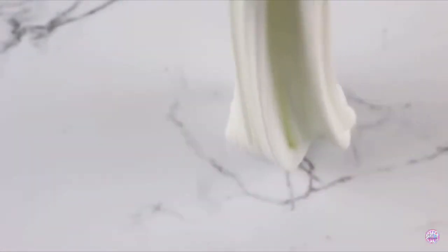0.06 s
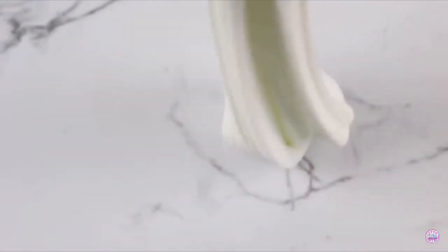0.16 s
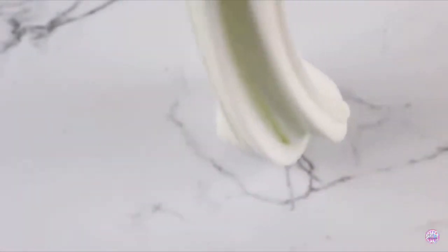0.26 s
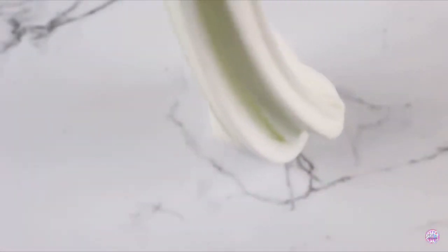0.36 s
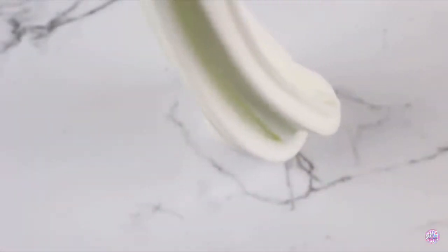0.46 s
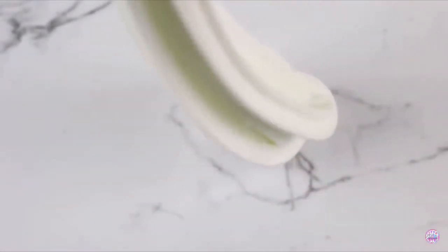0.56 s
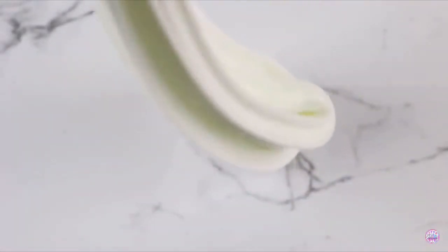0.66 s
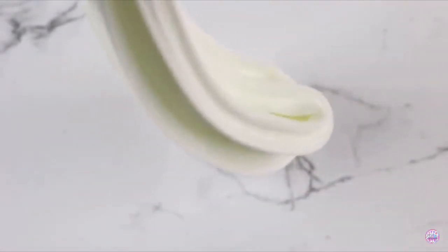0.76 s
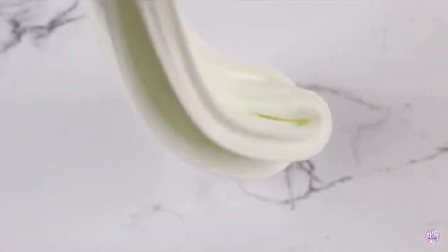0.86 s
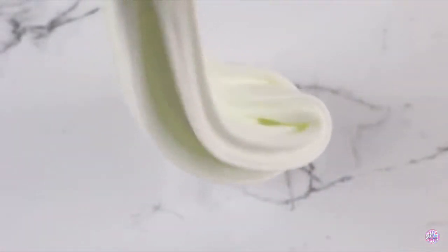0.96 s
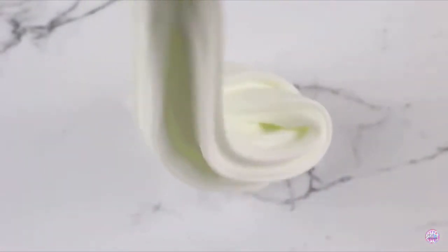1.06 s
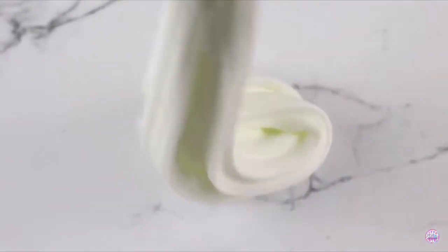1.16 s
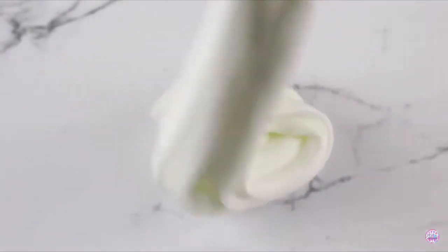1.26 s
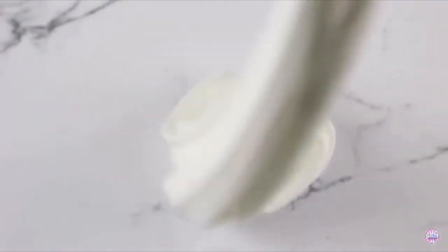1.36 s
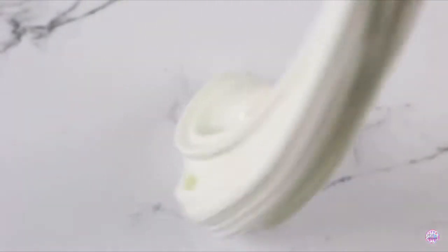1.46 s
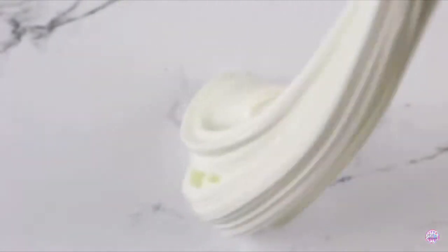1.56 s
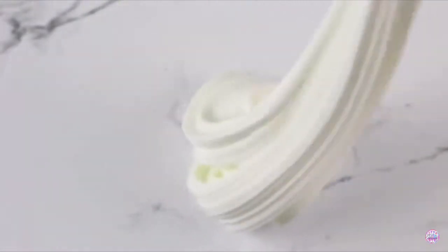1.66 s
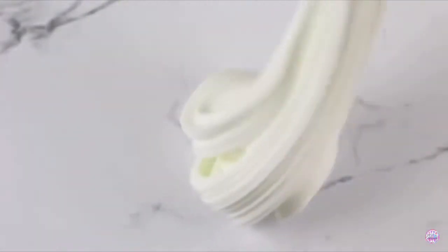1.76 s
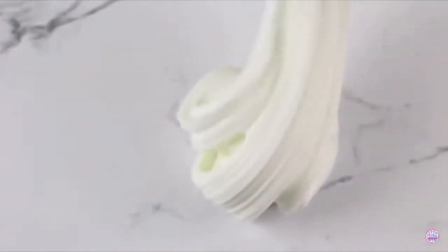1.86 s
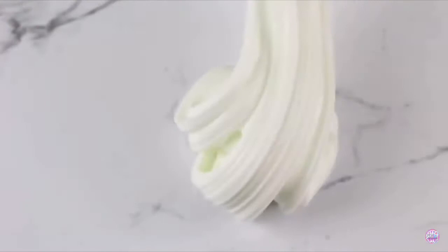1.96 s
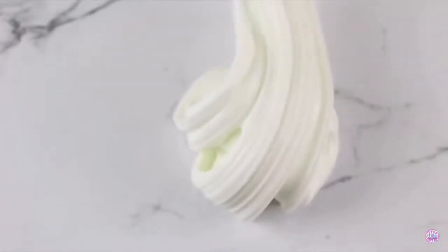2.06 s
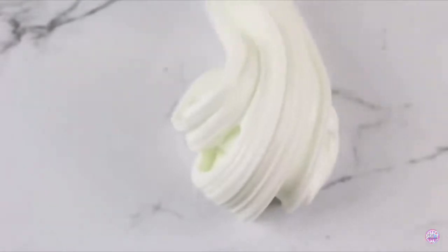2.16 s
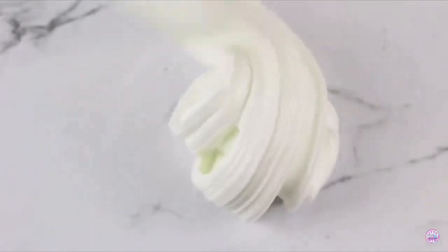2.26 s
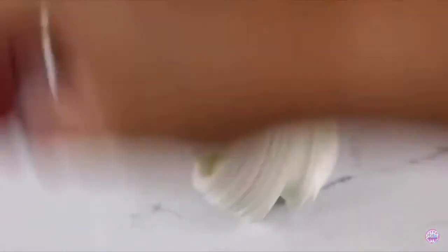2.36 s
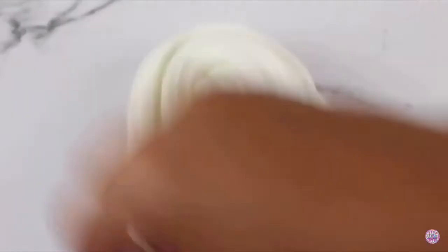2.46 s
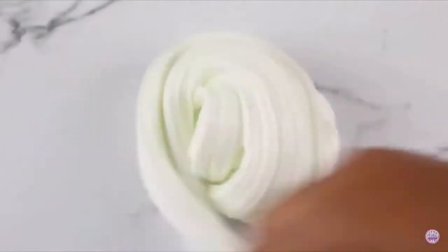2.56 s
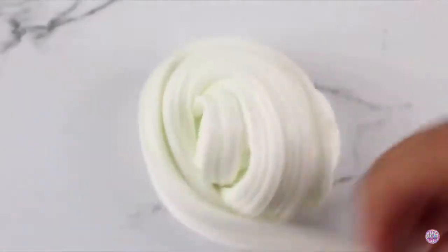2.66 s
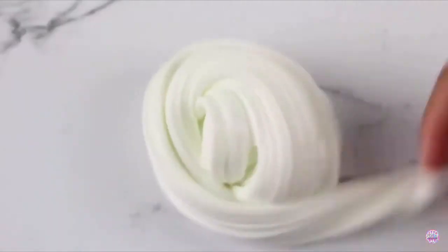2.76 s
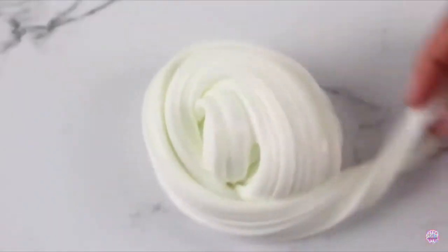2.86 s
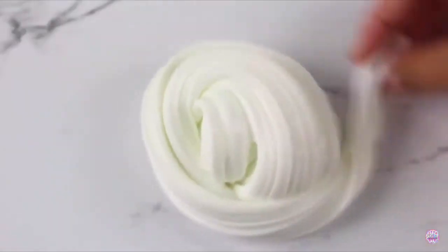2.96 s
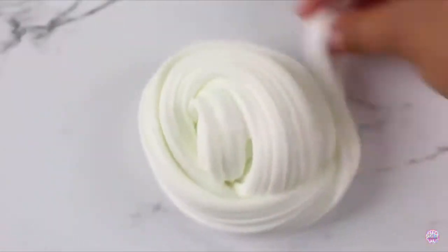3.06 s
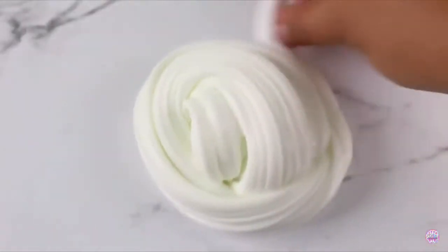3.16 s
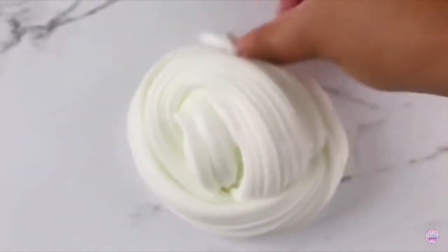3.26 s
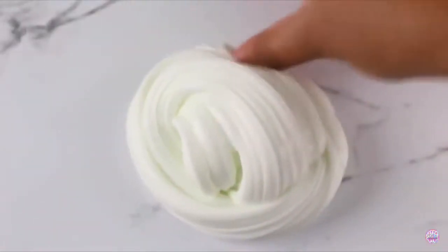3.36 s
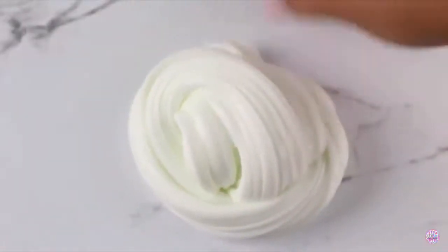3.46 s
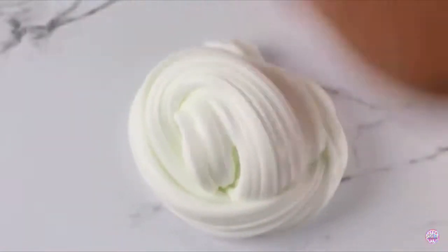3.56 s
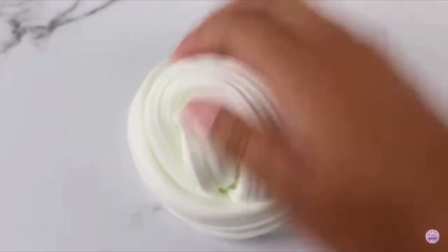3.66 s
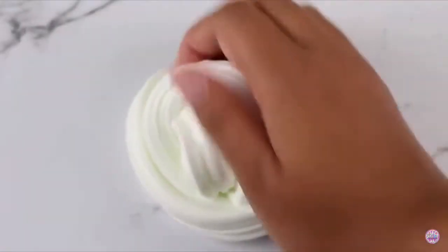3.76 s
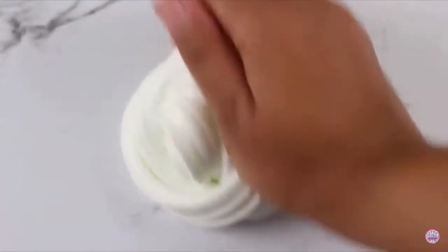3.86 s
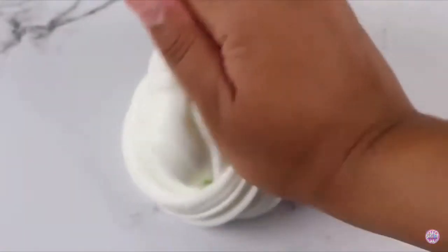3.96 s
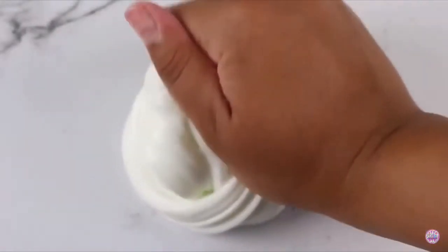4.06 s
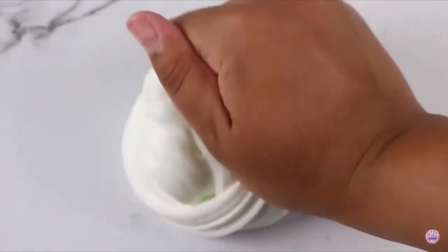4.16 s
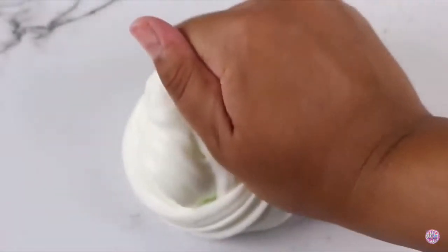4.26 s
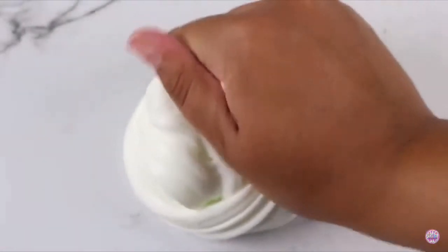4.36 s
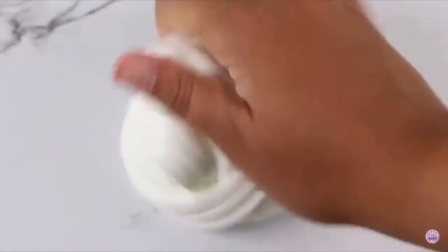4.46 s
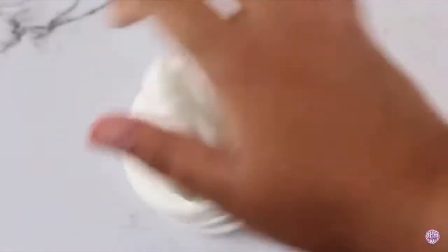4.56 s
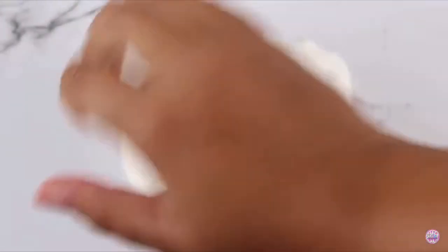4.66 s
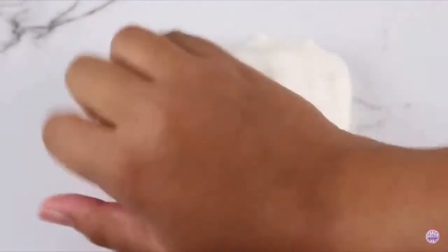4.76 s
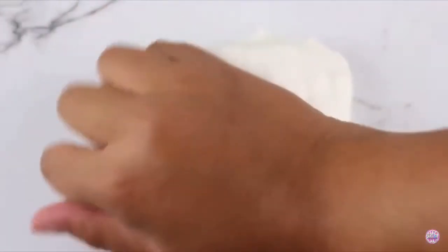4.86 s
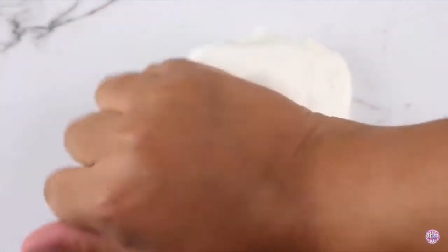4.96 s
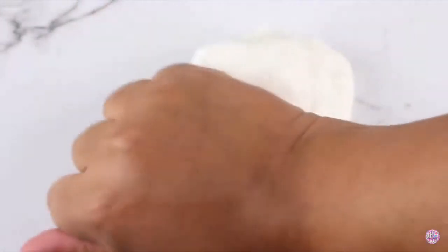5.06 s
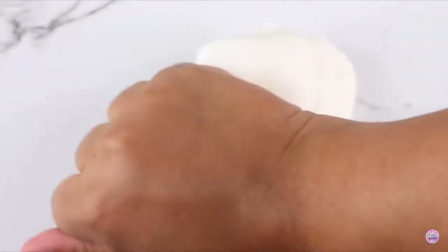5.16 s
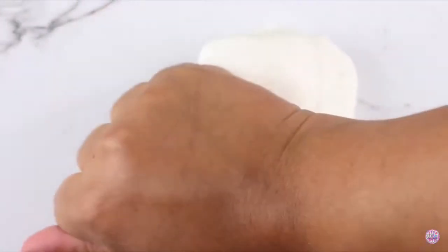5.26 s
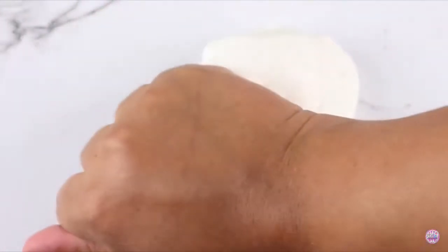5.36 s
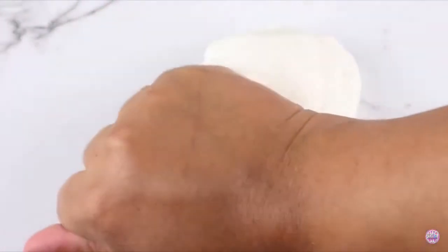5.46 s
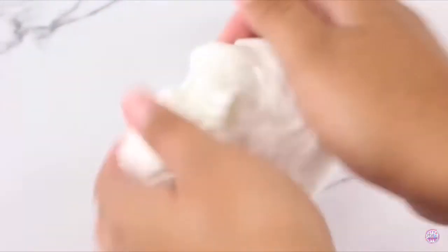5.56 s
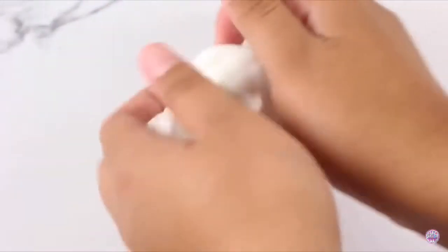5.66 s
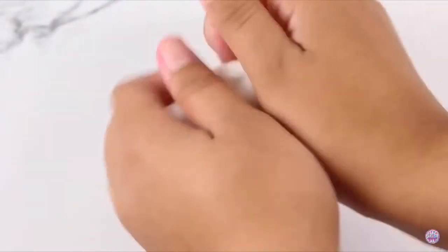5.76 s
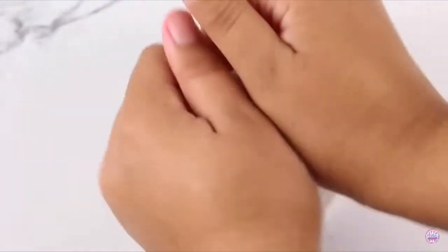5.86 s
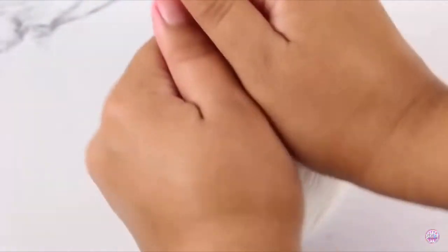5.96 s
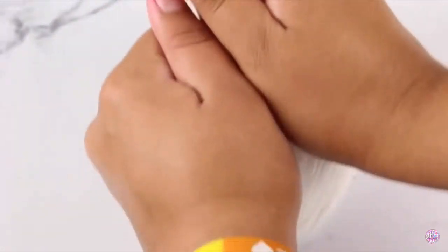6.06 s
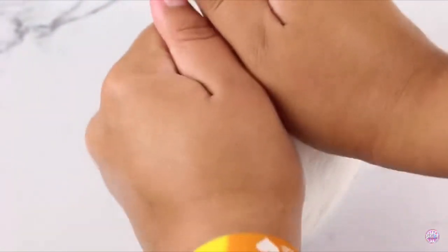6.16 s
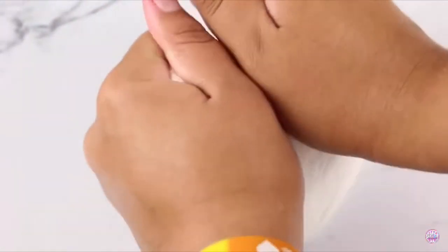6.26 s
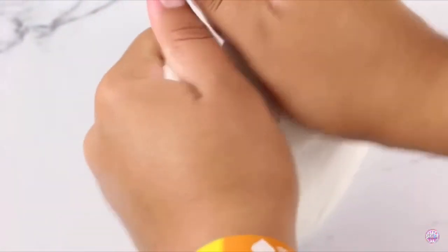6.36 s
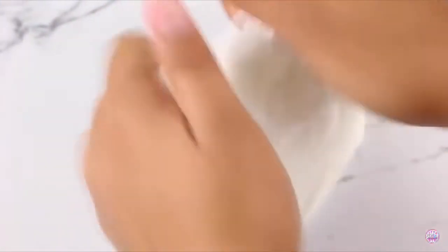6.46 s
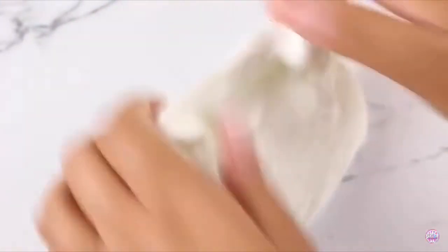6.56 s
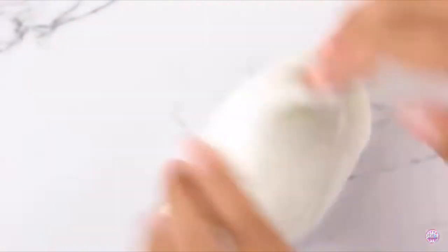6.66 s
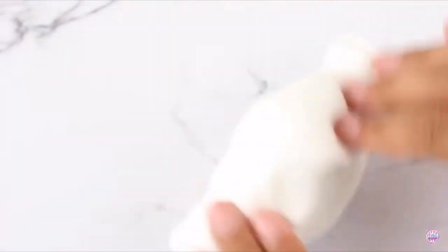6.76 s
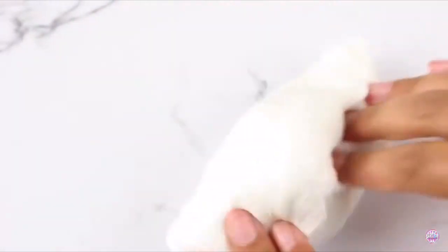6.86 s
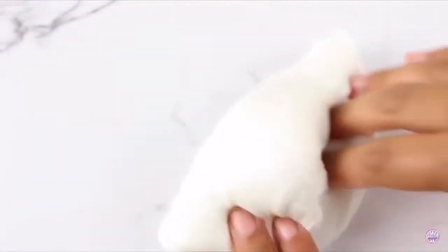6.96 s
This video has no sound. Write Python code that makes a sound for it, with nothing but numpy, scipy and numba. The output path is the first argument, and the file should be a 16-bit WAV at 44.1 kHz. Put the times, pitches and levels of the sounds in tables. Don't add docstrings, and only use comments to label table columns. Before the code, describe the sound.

Hands pat and squeeze airy slime on a hard tabletop, with sharp pops, bright snaps, wet gulps and hissing air close up in a quiet room.

```python
import sys
import numpy as np
from scipy import signal
from scipy.fft import rfft, irfft
from scipy.io import wavfile
from scipy.ndimage import uniform_filter1d
from numba import njit

SR = 44100
rng = np.random.default_rng(int(sys.argv[2]) if len(sys.argv) > 2 else 0)


def field_ratio(decibels):
    return 10 ** (np.asarray(decibels, dtype=float) / 20)


def generate_wav(sig):
    pcm = np.round(np.clip(np.atleast_2d(sig).T, -1, 1) * 32767).astype(np.int16)
    wavfile.write(sys.argv[1], SR, pcm)


N = 309136
TOP_HZ = 15720

# frequency in Hz, level in dB per Hz.
ROOM_HISS = [(12, -42), (42, -11), (66, -11), (193, -9), (472, -13.5), (1060, -16.5), (1610, -19),
             (16000, -28.5)]
# frequency in Hz, width of its wobble in Hz, level in dB.
MOTOR_HUM = [(58.6, 8.2, -52), (119, 23, -59)]

# start in seconds, level in dB, pocket pitch in Hz, length in ms.
PLAIN_POPS = [(2.7303, -36.5, 4460, 0.3), (3.008, -30.5, 1490, 1.7), (3.887, -37, 2450, 2.5),
              (4.1161, -32.5, 3800, 2.5), (4.1513, -31.5, 2830, 0.99), (4.2176, -32.5, 3900, 1.8),
              (4.2588, -17.5, 5300, 2.1), (4.2814, -21.5, 5360, 1.8), (4.4623, -13.5, 4120, 0.65),
              (4.6807, -23, 4160, 2), (5.0281, -22.5, 3240, 0.84), (5.0472, -28.5, 8000, 1.3),
              (5.1066, -27, 3320, 2.4), (5.1942, -13.5, 6600, 1.7), (5.2992, -7, 4900, 0.47),
              (5.5739, 1, 6150, 2.6), (5.5855, -45, 6070, 1.2), (5.8334, -32, 5940, 1.6),
              (5.857, -33, 3450, 2.5), (5.9462, -35, 4440, 1.4), (6.051, -30, 3600, 2.9),
              (6.2353, -16, 7350, 2.9), (6.312, -1, 3700, 0.83)]
# start in seconds, level in dB, pocket pitch in Hz, length in ms.
SNAPS = [(1.1651, -29.5, 6830, 0.34), (2.585, -43, 5000, .46), (3.3036, -42.5, 4820, 1.6),
         (3.378, -47, 4530, 1.2), (4.0884, -26, 4180, 3.1), (4.2725, -19.5, 6300, 1.5),
         (4.3277, -37, 1890, 1.1), (4.4103, -20.5, 7400, 2.1), (4.4734, -36, 3230, 1.4),
         (4.4948, -20, 3920, 0.5), (4.9899, -39, 1740, 0.82), (5.2828, -7, 2240, 2),
         (5.3462, -19, 4360, 2.5), (5.3565, -3, 4150, 1.8), (5.3566, -5, 2680, 1.6),
         (5.4005, -20.5, 2840, 1.2), (5.4365, -12.5, 4350, 0.39), (5.498, -28, 4860, 3.1),
         (5.53, -19, 6350, 0.72), (6.0839, -23, 3280, 1.1), (6.5066, -45, 7280, 1.7)]
# start in seconds, level in dB, pocket pitch in Hz, length in ms.
CRACKS = [(3.4321, -46.5, 2800, 2.6), (4.2941, -25, 6240, 1.4), (4.3115, -20, 3930, 3),
          (4.3453, -23, 4060, 1.2), (4.3527, -11, 2920, 1.7), (4.4545, -32, 7060, .58),
          (4.4836, -11.5, 5000, 0.47), (4.5392, -26.5, 1680, 0.81), (5.243, -26, 4610, .87),
          (5.5493, -24, 1460, 1.7), (6.3885, -33, 4010, 0.37), (6.428, -19.5, 4200, 0.45),
          (6.4601, -47, 2760, 1.1)]
# start in seconds, level in dB, pocket pitch in Hz, length in ms.
CUPPED_POPS = [(.0478, -41.5, 3280, 2.4), (3.0184, -28.5, 3170, 2.7), (3.173, -30.5, 3530, 3.7),
               (3.1878, -37.5, 2360, 2.7), (3.6154, -37, 3730, 2.8), (3.6305, -29, 4040, 3.1),
               (3.9641, -43, 2630, 2.4), (4.1982, -30.5, 7760, 5.9), (4.2887, -25, 4010, 1.8),
               (4.5028, -8.5, 2560, 1.6), (4.6412, -27, 4030, 1.9), (5.1258, -26.5, 4100, 1.1),
               (5.1882, -27, 2250, 7), (5.7006, -17, 2180, 2.7), (5.7183, -15, 2180, 1.8),
               (5.811, -15, 8500, 1.7), (6.1254, -27, 2600, 3.1), (6.1723, -17, 2570, 3.4),
               (6.1928, -6.5, 3570, 0.63), (6.2522, -27, 4310, 1.5), (6.446, -38, 6720, 1.1),
               (6.6809, -23.5, 3270, 2.5)]
# start in seconds, level in dB, pocket pitch in Hz, length in ms.
SMACKS = [(4.0449, -37, 1400, 2.2), (4.2762, -23.5, 2560, 2.9), (4.6167, -31, 2730, 7.4),
          (4.6304, -30, 4320, 2.9), (5.2137, -18, 3350, 2.2), (5.311, -17.5, 3620, 1.6),
          (5.7588, -20, 2740, 4), (5.9787, -31.5, 4300, 2.1), (6.0402, -37, 3100, 6.8),
          (6.0679, -35, 4380, 2.2), (6.686, -44, 2700, 1)]
# start in seconds, level in dB, pocket pitch
# in Hz, length in ms.
PLOPS = [
    (3.0013, -30, 1570, 0.61),
    (3.0213, -37, 1390, 6.1),
    (4.059, -24.5, 1400, 0.23),
    (4.1269, -33, 1430, 3.5),
    (4.3633, -39, 3140, 3.1),
    (5.9545, -35, 3140, .92),
]
# start in seconds, level in dB, pocket pitch in Hz, length in ms.
SOFT_POPS = [(1.1652, -34.5, 3800, 1.5), (3.112, -45, 3300, 3), (3.137, -44, 2400, 3),
             (3.151, -40, 3600, 4), (3.208, -40, 3400, 2), (3.218, -42, 2300, 4.4), (3.948, -43, 2620, 2),
             (4.1005, -37, 3960, 2), (4.133, -34, 3770, 1.8), (4.168, -36, 3200, 3),
             (4.347, -16.5, 4460, .8), (4.4857, -20, 5970, 0.79), (4.526, -27, 2700, 1.5),
             (4.668, -34, 5200, 3), (4.722, -33, 2300, 2.7), (4.69, -33, 1700, 3),
             (4.7376, -21.5, 1920, 1.8), (4.7495, -40, 3200, 2.3), (5.005, -43, 2400, 1.5),
             (5.0102, -37, 7550, 1.1), (5.1425, -20.5, 3400, 2.4), (5.155, -52, 7000, 1),
             (5.222, -25.5, 7500, 1), (5.7685, -24.5, 2700, 1.5), (6.1568, -14, 2500, 3.2),
             (6.2045, -32, 4500, 2), (6.304, -22, 4530, 2), (6.7151, -34, 3550, 2), (6.76, -35, 3860, 2.2),
             (6.771, -48, 3900, 2), (6.7969, -40, 2900, 2), (6.82, -41, 2970, 2.6), (6.8642, -48, 2590, 2)]
# start in seconds, level in dB, pocket pitch in Hz, length in ms.
DRY_SNAPS = [
    (4.1871, -29, 3780, 1.9),
    (6.205, -50, 7000, 1.2),
    (6.241, -10.5, 1820, 1.6),
    (6.2412, -10.5, 4100, 1.5),
    (6.2916, -7, 3660, 3.8),
    (6.343, -23, 5510, 1.2),
    (6.435, -5, 7000, 2.7),
    (6.877, -45, 2900, 0.91),
]
# its table, rasp in dB, snap in dB, hollow in dB.
KINDS = [
    (PLAIN_POPS, -11.5, -37, -37),
    (SNAPS, -12, -4.5, -36),
    (DRY_SNAPS, -8.5, -31, -51),
    (CRACKS, -6, 1.5, -13),
    (CUPPED_POPS, -16, -12, -20.5),
    (SMACKS, -22, -23, -7),
    (PLOPS, -29, -28, -2),
    (SOFT_POPS, -48, -32, -29),
]

# frequency in Hz, width in Hz, level in dB.
HOLLOW = [(820, 200, 15), (1100, 150, -82), (500, 250, -6)]
# start in seconds, peak in dB, length in ms.
FILMS = [(1.164, -41, 0.44), (2.7286, -26, 0.5), (3.0003, -24, 0.5), (3.6297, -25, 0.5),
         (4.0904, -18.5, 0.59), (4.1502, -33, 0.5), (4.1641, -27, 0.5), (4.1865, -17, 0.63),
         (4.1971, -23, 0.5), (4.2579, -15, 0.5), (4.2729, -6, 0.5), (4.3108, -3, 0.5), (4.3458, 4.5, 0.78),
         (4.3526, 3.5, 0.89), (4.4101, -15.5, 0.45), (4.453, -4.5, 0.5), (4.483, -7, 0.71),
         (4.5382, -12, 0.5), (4.6266, -21, 0.5), (4.7199, -22, 0.5), (4.9883, -28, 0.5), (5.009, -30, 0.5),
         (5.0285, -22, 0.55), (5.047, -29, 0.5), (5.107, -25, 0.5), (5.1255, -23, 0.5), (5.192, -27, 0.5),
         (5.2137, -14, 0.5), (5.2422, -24, 0.46), (5.2821, -1.5, 0.6), (5.3554, -31, 0.5),
         (5.3545, -16, 0.46), (5.3993, -19, 0.5), (5.4354, -6, 0.63), (5.4971, -21, 0.5), (5.529, -15, 0.5),
         (5.548, -18, 0.5), (5.5754, -1, 0.5), (5.7171, -8, 0.5), (5.757, -21, 0.5), (5.8104, -16, 0.36),
         (5.9546, -24, 0.5), (6.051, -25, 0.5), (6.0678, -33, 0.5), (6.0836, -16, 0.55), (6.1242, -34, 0.5),
         (6.1556, -24, 0.5), (6.1917, -10, 0.5), (6.243, -11, 0.5), (6.2409, -1.5, 0.59),
         (6.2915, 11, 0.48), (6.3097, -13, 0.44), (6.3417, -14, 0.5), (6.3883, -4.5, 0.5),
         (6.427, 2.5, 0.57), (6.437, 3, 0.6), (6.435, 4, 0.66), (6.685, -15, 0.5)]
# start in seconds, peak in dB, hollow pitch in Hz.
GULPS = [(1.165, -37.5, 818), (3.001, -18, 807), (3.021, -19, 900), (3.632, -32, 800), (4.058, -18, 842),
         (4.07, -27, 840), (4.11, -32, 786), (4.127, -24.5, 821), (4.186, -43, 708), (4.2, -33.5, 740),
         (4.258, -31, 790), (4.276, -14, 850), (4.311, -25.5, 816), (4.352, -15.5, 860), (4.432, -40, 902),
         (4.483, -23, 685), (4.501, -15.5, 845), (4.615, -25, 830), (4.63, -22, 750), (5.175, -35, 797),
         (5.214, -13, 678), (5.282, -29, 810), (5.31, -23, 810), (5.356, -23, 830), (5.436, -34, 800),
         (5.529, -35, 638), (5.572, -24.5, 554), (5.701, -22.5, 799), (5.717, -20, 720), (5.744, -26, 813),
         (5.759, -20, 830), (5.81, -16, 784), (5.942, -32.5, 721), (5.954, -30, 850), (5.978, -27.5, 870),
         (6.033, -35, 560), (6.033, -30, 760), (6.067, -26, 786), (6.156, -32, 890), (6.192, -17, 802),
         (6.239, -31, 910), (6.291, -15.5, 896), (6.31, -22, 970), (6.435, -35, 990), (6.435, -31, 1000),
         (6.621, -38, 696)]

# start in seconds, end in seconds, bubble pitch in Hz, early level in dB, late level in dB.
CRUSH = [(2.57, 2.63, 4760, -37, -48), (3.0, 3.05, 2700, -29, -33.5), (3.13, 3.22, 8600, -36, -54),
         (4.09, 4.24, 3330, -34, -62), (4.615, 4.7, 3000, -16.5, -28.5), (4.62, 4.75, 9000, -30.5, -39),
         (4.7, 4.8, 2980, -19, -60), (5.72, 5.88, 2650, -30.5, -47), (5.86, 6.03, 3440, -41.5, -30),
         (6.03, 6.15, 3400, -32, -37), (6.62, 6.73, 7900, -32, -44), (6.62, 6.8, 2750, -26, -39)]
# start in seconds, end in seconds, bubble pitch in Hz, early level in dB, late level in dB.
RUSTLE = [
    (3.085, 3.23, 3500, -32.5, -41),
    (3.12, 3.23, 2250, -34.5, -47),
    (3.085, 3.15, 5900, -35, -48),
]
# start in seconds, end in seconds, early level in dB, late level in dB.
SQUISH = [
    (3.02, 3.15, -38, -41),
    (4.05, 4.25, -30, -70),
    (4.36, 4.6, -32, -58),
    (4.61, 4.71, -22, -39),
    (5.09, 5.25, -38, -54),
    (5.35, 5.57, -34, -43),
    (5.7, 5.88, -29.5, -38.5),
    (5.93, 6.3, -38, -33.5),
    (6.3, 6.62, -60, -42),
    (6.62, 6.78, -31, -45),
]
# start in seconds, end in seconds, early level in dB, late level in dB.
LEANS = [
    (3.0, 3.5, -42, -63),
    (4.0, 4.45, -44.5, -42),
    (4.57, 4.67, -35, -33),
    (4.67, 4.76, -27, -41),
    (5.13, 5.3, -52, -30.5),
    (5.7, 5.86, -34.5, -44),
    (5.93, 6.28, -38, -42),
    (6.64, 7.0, -44.5, -45),
]
# start in seconds, end in seconds, jet pitch in Hz, early level in dB, late level in dB.
LEAKS = [(3.632, 3.67, 4180, -30.5, -55), (3.887, 3.91, 2770, -45, -60), (4.26, 4.35, 2490, -32, -32),
         (4.355, 4.46, 1920, -26.5, -40), (4.3, 4.6, 5460, -30, -40), (4.505, 4.6, 2080, -23.5, -35),
         (5.03, 5.07, 4300, -34, -57), (5.195, 5.3, 3840, -28, -44), (5.3, 5.36, 3550, -34, -31),
         (5.36, 5.57, 3770, -25, -30.5), (5.575, 5.7, 2060, -39, -30), (5.812, 5.89, 5270, -27.5, -43),
         (6.16, 6.24, 2940, -29, -25), (6.243, 6.31, 2410, -23.5, -26), (6.315, 6.43, 3230, -42, -26),
         (6.44, 6.63, 2660, -41.5, -31), (6.295, 6.45, 1450, -34, -56)]
# start in seconds, end in seconds, jet pitch in Hz, early level in dB, late level in dB.
SLITS = [(4.26, 4.35, 10600, -28.5, -38), (4.355, 4.46, 11300, -24, -37), (4.486, 4.6, 10800, -31, -50),
         (5.143, 5.19, 3360, -25.5, -46), (5.03, 5.06, 3300, -35, -42), (5.29, 5.57, 11100, -38, -36),
         (5.2, 5.28, 11500, -38, -49), (5.575, 5.74, 5290, -16, -18.5), (5.74, 5.8, 5330, -30, -52),
         (6.243, 6.36, 8700, -28, -60), (6.36, 6.435, 9500, -48, -31), (6.44, 6.63, 7800, -24, -30.5),
         (6.63, 6.76, 7860, -35, -46)]
# start in seconds, end in seconds, jet pitch in Hz, early level in dB,
# late level in dB.
WHISTLES = [
    (5.575, 5.74, 8870, -31, -34),
    (5.575, 5.74, 12000, -32, -44),
    (5.575, 5.74, 14500, -44, -46),
    (6.243, 6.29, 1550, -31, -28),
    (4.755, 4.79, 1560, -40, -48),
    (6.16, 6.24, 2900, -31, -30),
    (6.316, 6.36, 1540, -26, -37),
    (6.7, 6.78, 3530, -36, -43),
]
# start in seconds, end in seconds, early level in dB, late
# level in dB.
LOW_THUMPS = [
    (4.353, 4.36, -9.5, -20),
    (5.283, 5.29, -40, -42),
    (5.357, 5.366, -35, -26),
    (5.574, 5.582, -19, -36),
    (6.313, 6.32, -32, -31),
    (6.436, 6.443, -30, -35),
]

# start in seconds, peak in dB.
KNOCKS = [(3.005, -36), (3.022, -30.5), (3.634, -43.5), (3.648, -37), (4.123, -40), (4.276, -49),
          (4.632, -36), (5.129, -44.5), (5.746, -38), (5.974, -40), (6.679, -44)]
# frequency in Hz, level in dB, time to fall 60 dB in seconds.
TABLE_TONES = [(278.6, 3.5, 0.24), (250, -0.5, 0.11), (221, -31, 0.054), (526, -4, 0.02), (102, -8, 0.38)]


def unit(x):
    return x / np.sqrt(np.mean(x ** 2))


@njit
def svf(x, hz, width):
    y, b, l = np.empty(len(x)), 0., 0.
    for i in range(len(x)):
        g, k = np.tan(np.pi * hz[i] / SR), width[i] / hz[i]
        v = (b + g * (x[i] - l)) / (1 + g * (g + k))
        b, l, y[i] = 2 * v - b, l + 2 * g * v, k * v
    return y


def ring(x, hz, width):
    one = np.ones(len(x))
    return svf(x, np.clip(hz * one, 20, .45 * SR), width * one)


def band(x, lo_hz, hi_hz, order=3):
    sos = signal.butter(order, [lo_hz, min(hi_hz, .45 * SR)], "band", fs=SR, output="sos")
    return signal.sosfilt(sos, x)


def walk(rate):
    hold = int(SR / rate)
    steps = np.repeat(rng.standard_normal(N // hold + 1), hold)
    return unit(uniform_filter1d(steps, hold)[:N])


def room():
    hz, db = np.transpose(ROOM_HISS)
    f = np.maximum(np.arange(N // 2 + 1) * SR / N, 1)
    colour = field_ratio(np.interp(np.log(f), np.log(hz), db))
    hiss = irfft(rfft(rng.standard_normal(N)) * colour, N)
    t = np.arange(N) / SR
    hum = 0
    for hz, width, db in MOTOR_HUM:
        wobble = unit(ring(rng.standard_normal(N), hz, width))
        tone = np.sin(2 * np.pi * hz * t) + 0.2 * wobble
        hum = hum + field_ratio(db + 1.3 * walk(2.5)) * tone
    return field_ratio(-48) * unit(hiss) + hum


def hollow(x):
    return sum(field_ratio(db) * ring(x, hz, width) for hz, width, db in HOLLOW)


def pops():
    size = 2048
    out = np.zeros(N + 4096)
    t_ms = np.arange(size) / SR * 1000
    spike = t_ms == 0
    first = slice(0, size // 16)
    chance = rng.standard_normal((2, N + size))
    bursts = [(*row, *colour) for rows, *colour in KINDS for row in rows]
    for s, db, hz, ms, rasp_db, snap_db, hollow_db in bursts:
        at = int(s * SR)
        tear, puff = chance[:, at:at + size]
        length_ms = max(ms, .25)
        fade = np.exp(-t_ms / (.85 * length_ms)) + .12 * np.exp(-t_ms / 4.5)
        burst = tear * fade + 4.2 * spike
        opening_hz = hz * (1 - 0.3 * np.exp(-t_ms / 0.2))
        note = np.sin(2 * np.pi * np.cumsum(opening_hz) / SR) * np.exp(-t_ms / (0.52 * length_ms))
        pocket = ring(ring(burst, opening_hz, 0.65 * hz), opening_hz, 0.65 * hz)
        pocket = pocket + 0.18 * note + field_ratio(rasp_db) * band(burst, 1040, 7200)
        snap = band(burst * np.exp(-t_ms / 1.0), 4300, 14500)
        low = hollow(1.6 * puff * fade - 1.26 * spike)
        for layer, rel_db in ((pocket, 0), (snap, snap_db), (low, hollow_db)):
            out[at:at + size] += field_ratio(db + rel_db) * layer / np.sqrt(np.mean(layer[first] ** 2))
    return out[:N]


def films():
    level = np.zeros(N + SR)
    t_ms = np.arange(SR // 40) / SR * 1000
    for s, db, ms in FILMS:
        at = int((s + .0007) * SR)
        level[at:at + len(t_ms)] += field_ratio(db - 6) * np.exp(-t_ms / max(ms, .15))
    return level[:N] * unit(band(rng.standard_normal(N), 7000, 15600))


def gulps():
    width_hz = 156
    out = np.zeros(N + SR)
    t = np.arange(SR // 20) / SR
    for s, db, hz in GULPS:
        at = int(s * SR)
        fade = np.exp(-np.pi * width_hz * t) * np.minimum(t / 0.0011, 1)
        shape = np.sin(2 * np.pi * hz * t) * fade
        out[at:at + len(t)] += field_ratio(db - 0.5) * shape / shape.max()
    return out[:N]


def foam(density, scatter_db, smear_ms):
    sizes = (rng.random(N) < density / SR) * field_ratio(scatter_db * rng.exponential(size=N))
    keep = np.exp(-1000 / (smear_ms * SR))
    flicker = unit(signal.lfilter([1], [1, -keep], sizes))
    return unit(rng.standard_normal(N) * (.5 + flicker))


def gusts(table, grain, rise_s, fall_s, order):
    out = np.zeros(N)
    for start, end, lo_hz, hi_hz, early_db, late_db in table:
        grain = np.roll(grain, SR // 3)
        a, b = int(start * SR), min(int((end + fall_s) * SR), N)
        t = np.arange(a, b) / SR
        db = early_db + (late_db - early_db) * ((t - start) / (end - start) - .2) / 0.94
        rise = np.clip((t - start) / rise_s, 0, 1)
        fall = np.clip((end + fall_s - t) / (2 * fall_s), 0, 1)
        noise = ring(grain[a:b], np.sqrt(lo_hz * hi_hz), 0.93 * (hi_hz - lo_hz))
        out[a:b] += field_ratio(db) * rise * fall * unit(band(noise, lo_hz, hi_hz, order=order))
    return out


def around(rows, spread):
    return [(start, end, hz / spread, min(hz * spread, TOP_HZ), *db) for start, end, hz, *db in rows]


def within(rows, edges_hz):
    return [(start, end, *edges_hz, *db) for start, end, *db in rows]


def squeeze():
    bubbles = around(CRUSH, 2.07) + around(RUSTLE, 1.25) + within(SQUISH, (500, 1400))
    jets = around(LEAKS, 2.09) + around(SLITS, 1.43) + around(WHISTLES, 1.11)
    crackle = foam(density=600., scatter_db=1.6, smear_ms=1.6)
    fine_hiss = foam(density=1500., scatter_db=1.5, smear_ms=1.5)
    rubbing = foam(density=57.0, scatter_db=6.0, smear_ms=20.0)
    crush = gusts(bubbles, crackle, rise_s=.035, fall_s=.025, order=2)
    leaks = gusts(jets, fine_hiss, rise_s=.001, fall_s=.005, order=6)
    rumble = gusts(within(LEANS, (67, 430)), rubbing, rise_s=0.044, fall_s=0.0086, order=2)
    air = rng.standard_normal(N)
    low_thumps = gusts(within(LOW_THUMPS, (30, 470)), air, rise_s=0.0028, fall_s=0.0036, order=1)
    return crush + leaks + rumble + low_thumps


def knocks():
    t = np.arange(SR // 4) / SR
    top = sum(field_ratio(db) * np.sin(2 * np.pi * hz * t) * field_ratio(-60 * t / t60) for hz, db, t60 in TABLE_TONES)
    blows = np.zeros(N)
    for s, db in KNOCKS:
        blows[int(s * SR)] = field_ratio(db)
    push = np.hanning(int(0.00046 * SR))
    return signal.fftconvolve(blows, np.convolve(top, push / push.sum()))[:N]


def bounce(x):
    echo_ms, echo_db = 1.55, -6
    lag = echo_ms * (1 + 0.096 * walk(30)) * SR / 1000
    now = np.arange(N)
    return x + field_ratio(echo_db + 1.3 * walk(40)) * np.interp(now - lag, now, x)


def space(x):
    wall_ms, wall_db = 11.6, -14
    tail_db, tail_t60_s = -15.5, 0.56
    t = np.arange(SR // 3) / SR
    tail = rng.standard_normal(len(t)) * field_ratio(-60 * t / tail_t60_s) * np.minimum(t / 0.003, 1)
    tail = band(tail, 180, 10600)
    response = field_ratio(tail_db) * tail / np.sqrt(np.sum(tail ** 2))
    response[0] = 1
    wall = int(wall_ms * SR / 1000)
    response[wall:wall + 3] += field_ratio(wall_db) * np.array([.25, .5, .25])
    return signal.fftconvolve(x, response)[:N]


def ducking(x):
    from_db, slope, recover_db_per_s = -13, 2.3, 50
    ramp_db = recover_db_per_s * np.arange(N) / SR
    loud_db = 10 * np.log10(np.maximum(uniform_filter1d(x ** 2, size=128), 1e-12))
    held_db = np.maximum.accumulate(loud_db + ramp_db) - ramp_db
    excess_db = np.maximum(held_db - from_db, 0)
    return field_ratio(-slope * uniform_filter1d(excess_db, size=512))


def scene():
    air = room()
    slime = bounce(pops() + films()) + gulps() + field_ratio(-7.5) * squeeze()
    near = space(slime) + knocks()
    gain = ducking(near)
    bass = signal.lfilter(*signal.butter(1, 750, fs=SR), air)
    treble = air - bass
    return (near + gain * bass + gain ** 0.063 * treble)[None]


def low_pass(x):
    return signal.sosfilt(signal.butter(12, 16440, fs=SR, output="sos"), x)


def record(dry):
    thump = band(np.minimum(dry ** 2, 1.5), 76, 1100, order=1)
    x = dry + 0.04 * thump
    hz = np.arange(N // 2 + 1) * SR / N
    top_cut = np.clip((TOP_HZ + 150 - hz) / 300, 0, 1) ** 2
    x = irfft(rfft(x) * top_cut, N)
    return low_pass(np.clip(x, -1, 1))


dry = scene()
out = record(dry)
generate_wav(out)
```